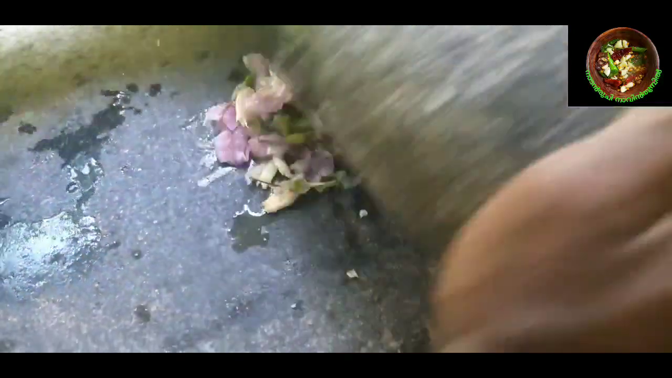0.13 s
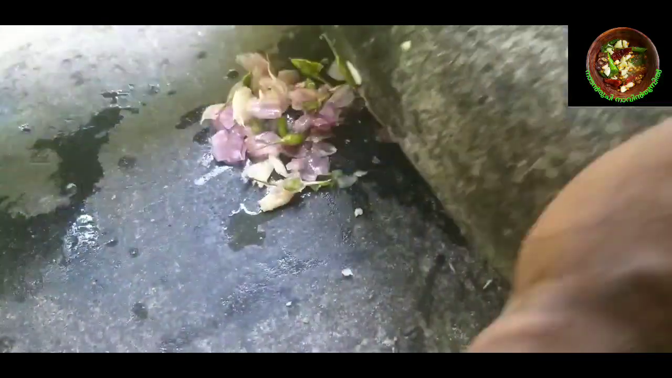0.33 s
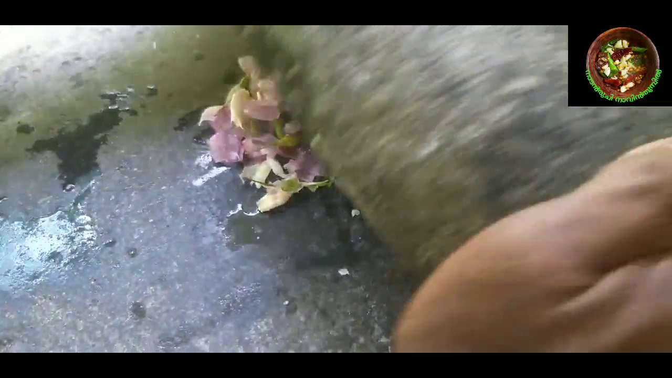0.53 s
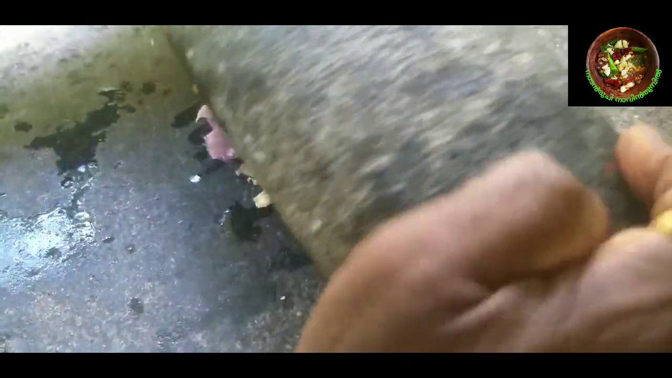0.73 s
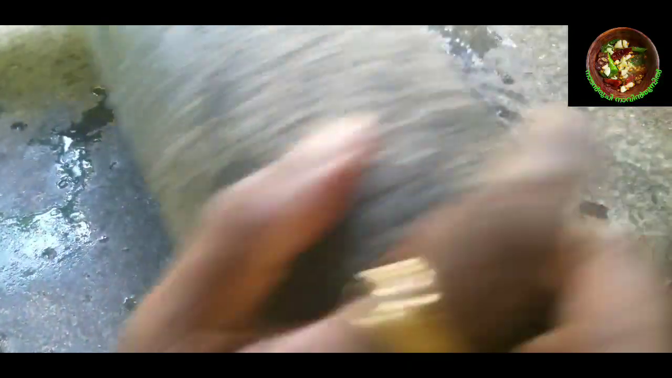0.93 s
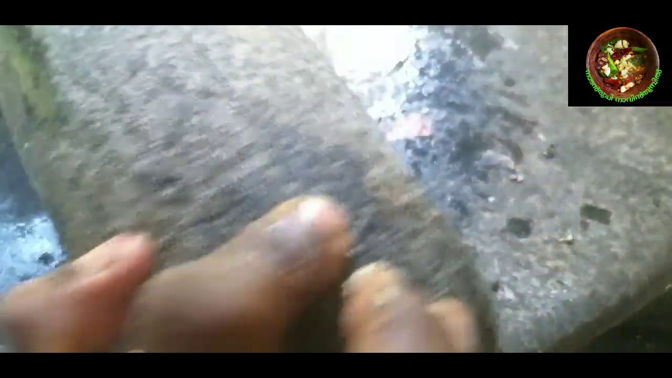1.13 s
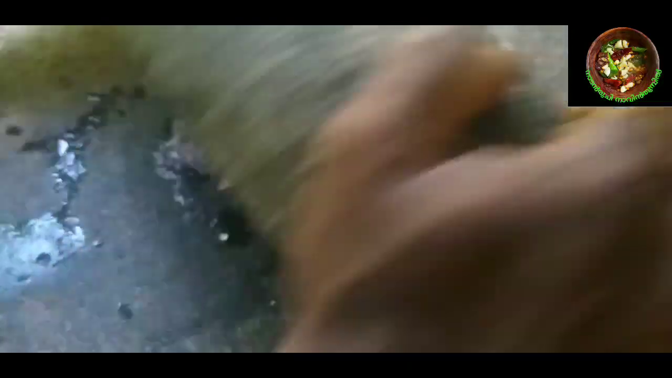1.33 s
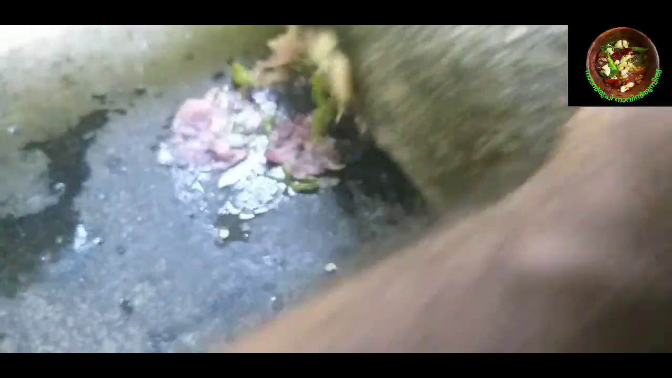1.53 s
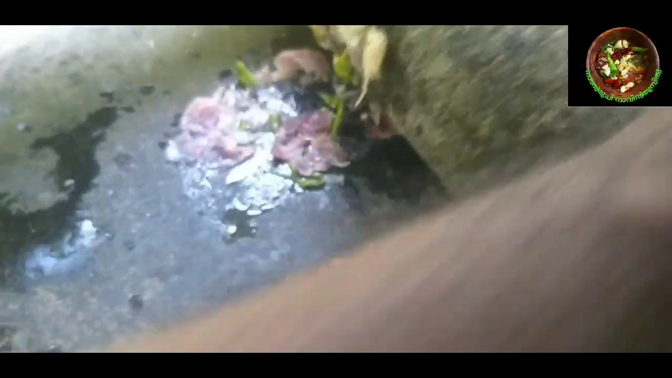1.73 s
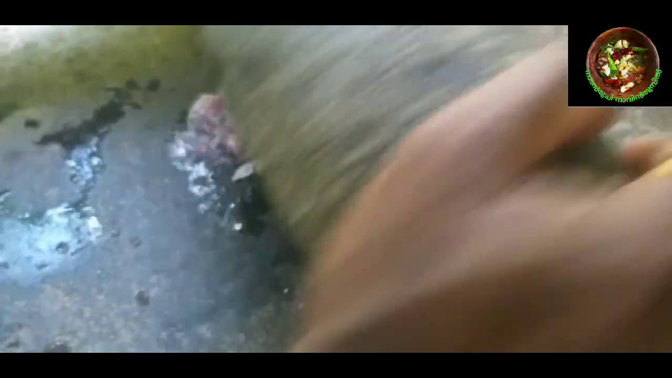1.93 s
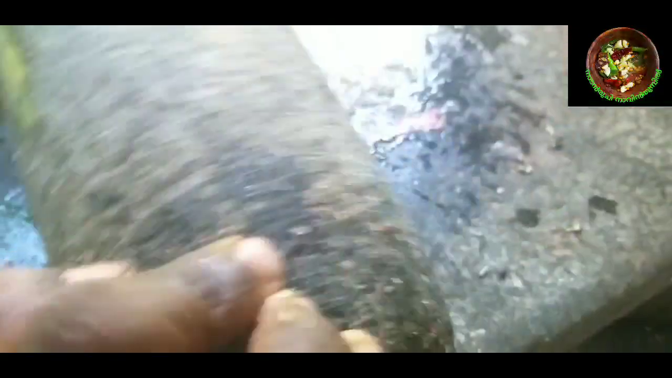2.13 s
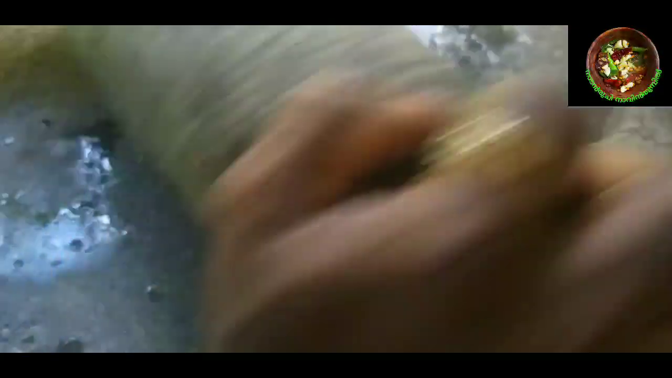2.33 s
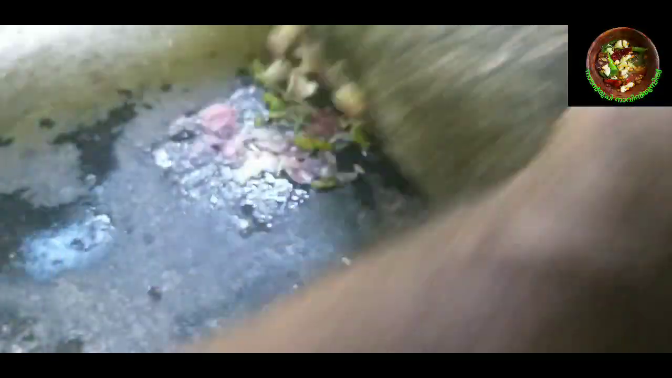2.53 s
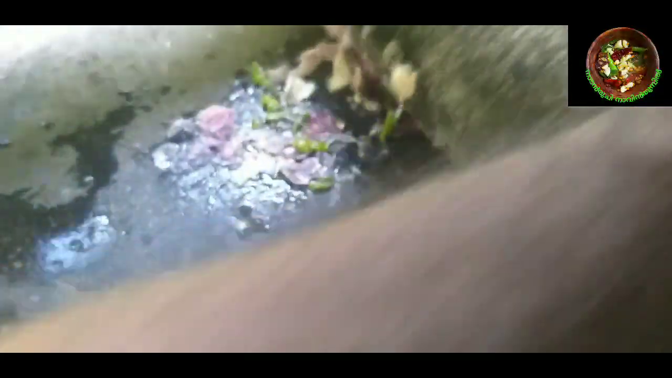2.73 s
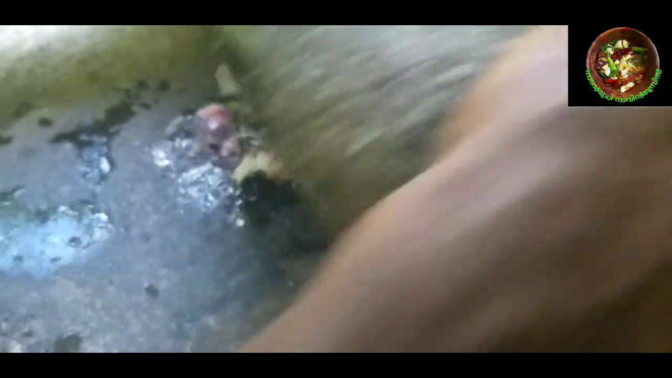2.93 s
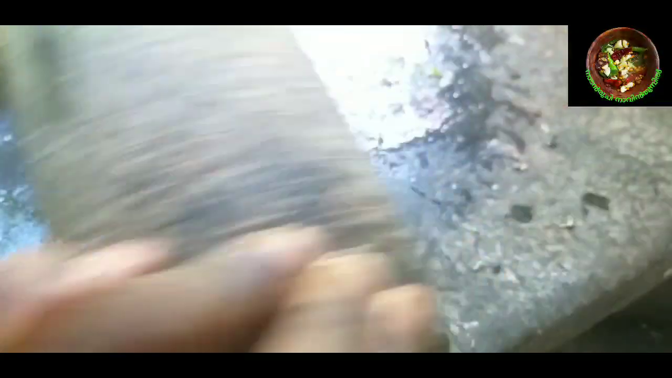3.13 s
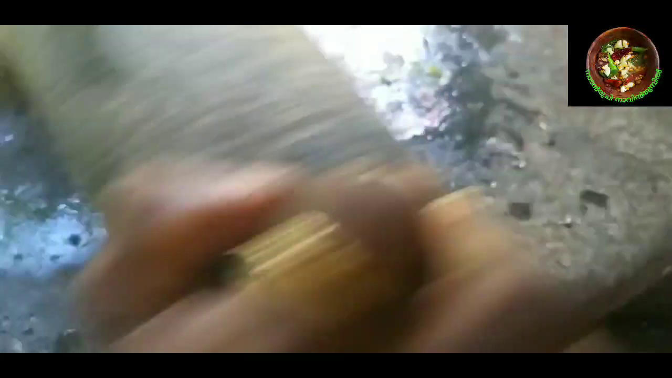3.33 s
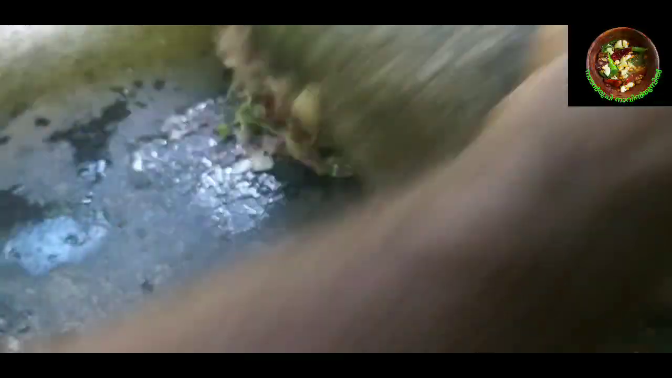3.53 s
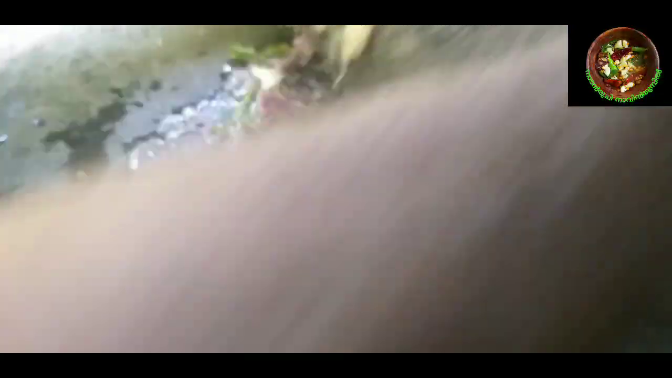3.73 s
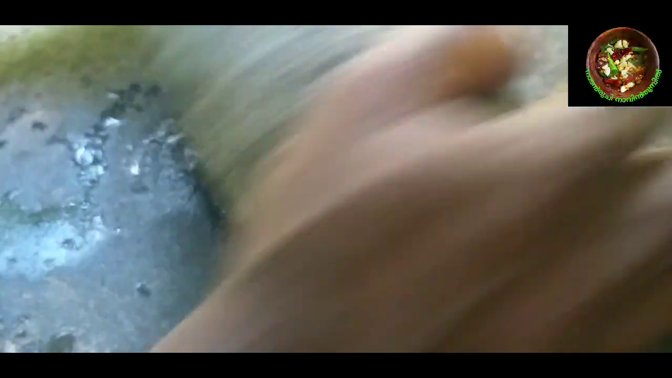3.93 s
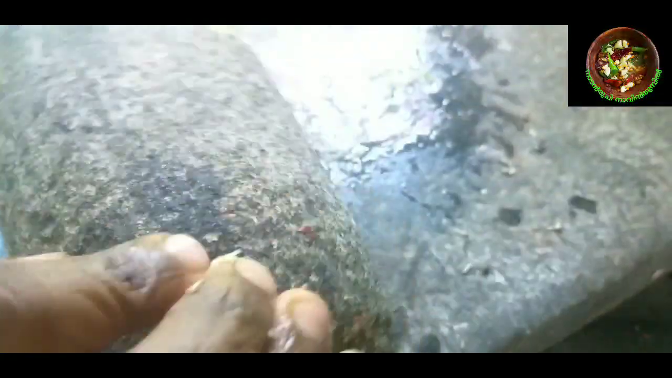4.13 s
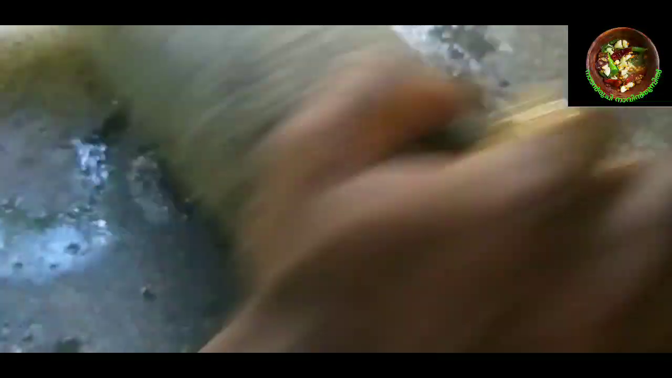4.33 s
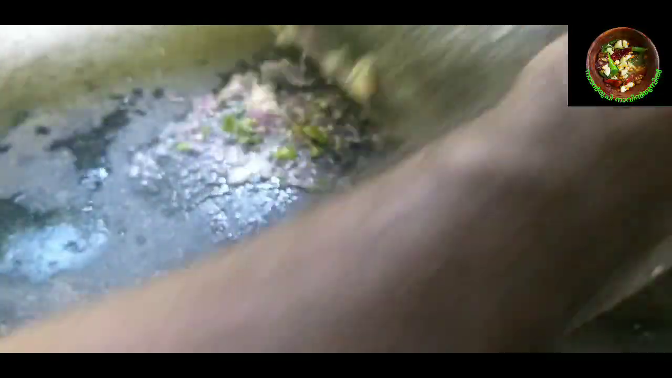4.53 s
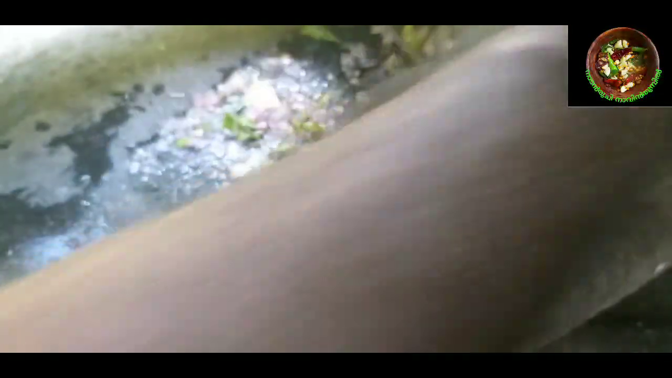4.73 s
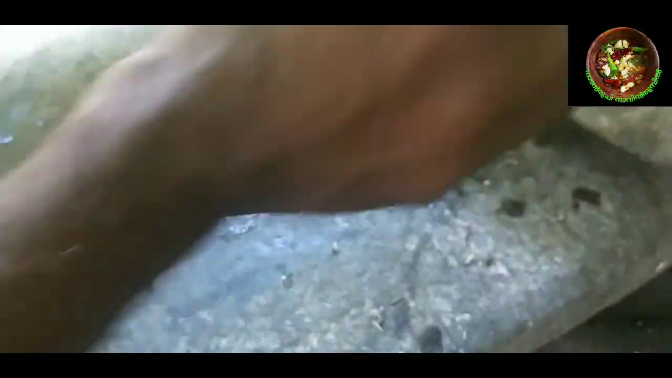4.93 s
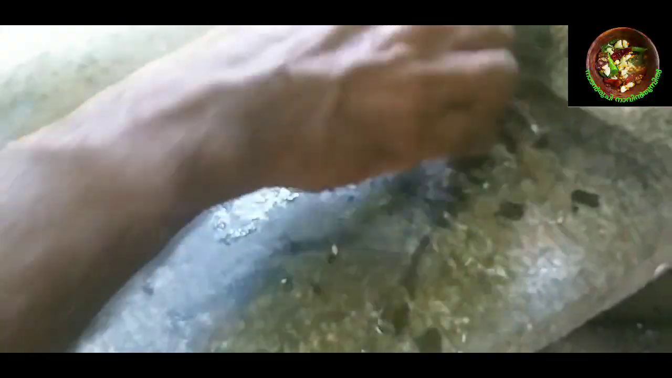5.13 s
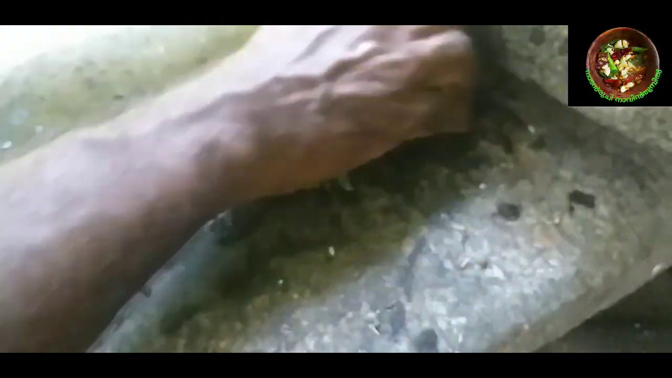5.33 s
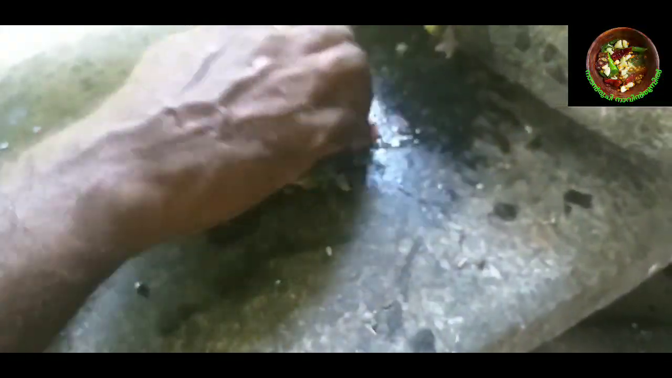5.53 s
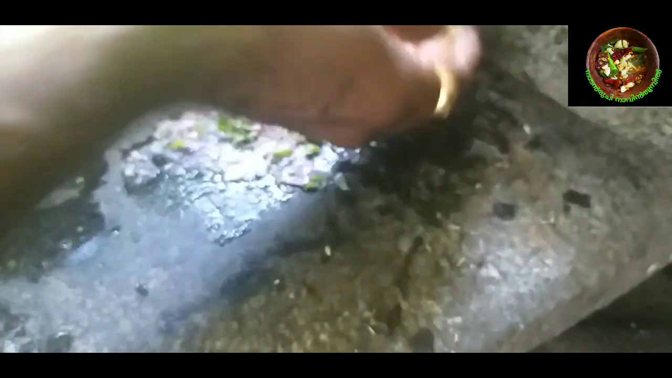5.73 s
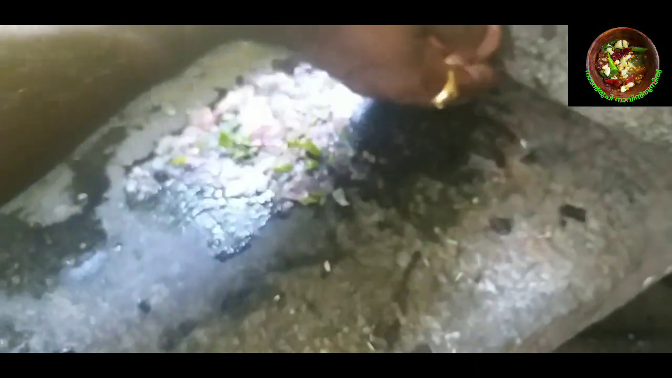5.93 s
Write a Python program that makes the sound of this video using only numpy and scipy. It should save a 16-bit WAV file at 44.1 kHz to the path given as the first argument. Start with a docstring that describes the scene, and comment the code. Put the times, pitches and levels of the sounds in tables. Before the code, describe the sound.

A close microphone hears wet vegetable pulp being ground between stones. It starts lightly with a few sharp snaps, then fuller strokes bring dense juicy crackle, squelches and gritty rasps, with hollow dull thuds where the roller drops. Small squeaks slip through. Finally the crushing stops, the stone bumps gently aside and a hand brushes the wet paste together. Short room reflections, faint hiss and a barely audible high whine surround it.

```python
"""In a kitchen, close to a wet grinding slab: faint hiss and a thin wavering whine (both filtered noise) throughout.
First shallots and chillies crackle, snap and squelch (random clicks through filters) under a stone roller.
As it is pushed to and fro it rumbles and drops with dull knocks (struck slab modes), with thin squeaks and rasping.
At the end it is set aside with a few soft bumps, and a hand sweeps the paste together in a fine rustle."""
import sys
import numpy as np
from scipy import signal
from scipy.fft import rfft, irfft
from scipy.io import wavfile

SR = 44100
rng = np.random.default_rng(int(sys.argv[2]) if len(sys.argv) > 2 else 0)


def generate_wav(signal):
    """Clip the signal to [-1, 1] and save it as 16-bit WAV at the path in sys.argv[1]."""
    frames = np.transpose(np.atleast_2d(signal))
    scaled = np.clip(frames, -1, 1) * 32767
    pcm = np.round(scaled).astype(np.int16)
    wavfile.write(sys.argv[1], SR, pcm)


N = 268569
TIME = np.arange(N) / SR
CUTOFF_HZ = 15800


def from_db(db):
    """Decibels to gain."""
    return 10 ** (np.asarray(db) / 20)


def together(a_db, b_db):
    """Level of two unrelated sounds heard at once: their powers add."""
    return 10 * np.log10(from_db(a_db) ** 2 + from_db(b_db) ** 2)


def rms_one(x):
    """Scale to rms 1."""
    return x / np.sqrt(np.mean(x ** 2) + 1e-20)


def at_hz(points, hz):
    """Read a table of (hz, value) on a log-frequency axis."""
    table_hz, values = np.array(points).T
    return np.interp(np.log(hz), np.log(table_hz), values)


def cut(x, hz, kind, order=2):
    """Butterworth filter."""
    hz = np.clip(hz, 10, .47 * SR)
    return signal.sosfilt(signal.butter(order, hz, kind, fs=SR, output="sos"), x + 1e-18)


def resonate(x, hz, q):
    """Band-pass resonance of sharpness q, never wider than a third of the sample rate."""
    hz = min(hz, SR / 3)
    b, a = signal.iirpeak(hz, max(q, 3 * hz / SR), fs=SR)
    return signal.lfilter(b, a, x)


def drift(rate_hz):
    """Slow random wandering of rms 1, with a new target rate_hz times a second."""
    knots = rng.standard_normal(int(rate_hz * N / SR) + 2)
    return rms_one(np.interp(TIME * rate_hz, np.arange(len(knots)), knots))


def grains(per_s, spread_db, size):
    """Random clicks of uneven strength and either sign, rms 1."""
    born = rng.random(size) < per_s / SR
    strength = from_db(spread_db * np.minimum(rng.exponential(1, size), 4))
    return rms_one(born * strength * rng.choice([-1, 1], size))


def add(out, s, sound):
    """Mix a sound in at time s."""
    at = max(round(s * SR), 0)
    out[at:at + len(sound)] += sound[:N - at]


def bands(low_hz, count):
    """Equal log-width bands up to the cut-off: (low, centre, high)."""
    edges = np.geomspace(low_hz, CUTOFF_HZ, count + 1)
    return zip(edges, np.sqrt(edges[:-1] * edges[1:]), edges[1:])


def effort(moves, levels_db, release_db_per_s, swell_db, lag_s=0, rise_db=20):
    """Level in dB of a run of movements: each rises, bends by swell_db towards its middle, then dies away."""
    power = 1e-12
    for (s, rise, hold, *_), db in zip(moves, levels_db):
        age = TIME - s - lag_s
        attack = rise_db * np.minimum(age / rise, 0)
        swell = swell_db * (np.sin(np.pi * np.clip(age / hold, 0, 1)) - .5)
        release = release_db_per_s * np.maximum(age - hold, 0)
        power = power + from_db(db + attack + swell - release) ** 2
    return 10 * np.log10(power)


# still air of the kitchen, colour only: pitch_hz [Hz], density_db [dB per Hz, relative]
AIR = [(25, -17), (60, -8), (110, 0), (180, 0), (400, -12), (1000, -17), (2500, -22), (6500, -26),
       (8600, -23), (10100, -18), (11000, -20), (12000, -25), (16000, -25)]


def air(level_db=-70):
    """Steady faint hiss: white noise shaped to the colour of the still air."""
    hz = np.maximum(np.fft.rfftfreq(N, 1 / SR), 1)
    spectrum = rfft(rng.standard_normal(N)) * from_db(at_hz(AIR, hz))
    return from_db(level_db) * rms_one(irfft(spectrum, N))


# thin, high whine in the background: time_s [s], pitch_hz [Hz]
WHINE_GLIDE = [(0, 9350), (1.5, 9200), (4.2, 9200), (5.5, 9100), (5.8, 9160), (6.09, 9270)]


def whine(level_db=-82, width_hz=170):
    """A narrow band of hiss on a slowly gliding pitch."""
    pitch_hz = np.interp(TIME, *np.transpose(WHINE_GLIDE))
    phase = 2 * np.pi * np.cumsum(pitch_hz) / SR
    a, b = cut(rng.standard_normal((2, N)), width_hz / 2, "low")
    return from_db(level_db) * rms_one(a * np.cos(phase) + b * np.sin(phase))


# reverberation of the kitchen: pitch_hz [Hz], t60_s [s to fall by 60 dB]
KITCHEN_DECAY = [(100, 0.56), (250, 0.43), (600, 0.34), (1500, 0.32), (5000, 0.14), (15000, 0.2)]


def kitchen(x, gap_s=0.0043):
    """Diffuse reflections, begun after a short gap, that on the whole die sooner in the treble."""
    t = TIME[:SR * 2 // 3]
    tail = 0
    for low, hz, high in bands(92, count=9):
        noise = cut(rng.standard_normal(len(t)), [low, high], "band")
        tail = tail + noise * from_db(-60 * t / at_hz(KITCHEN_DECAY, hz))
    tail = cut(tail * (t > gap_s), 90, "high")
    return signal.fftconvolve(x, tail / np.linalg.norm(tail))[:N]


# the hand sets the roller aside and sweeps the paste together; levels before swell and trims:
# full_s [s, end of the rise], rise_s [s per 20 dB], hold_s [s], pitch_hz [Hz, of the rustle],
# rustle_db, grit_db, rumble_db [dB]
SWEEPS = [(4.62, .05, .08, 4500, -64.5, -65, -58), (4.9, .15, .16, 4200, -66, -76, -58),
          (4.95, .3, .42, 10000, -76, -88, -70), (5.21, .1, .12, 5500, -71.5, -78, -55),
          (5.47, .06, .07, 8000, -70, -77, -61), (5.62, .1, .14, 4000, -88, -88, -62)]


def sweeping(q=1.0, uneven_db=1.0):
    """Fingers drag wet pulp over stone: a fine crackle, each pass with its own colour and uneven pressure."""
    out = 0
    for move in SWEEPS:
        *_, hz, rustle_db, _, _ = move
        level_db = effort([move], [rustle_db], release_db_per_s=189, swell_db=1.0)
        level_db = level_db + uneven_db * drift(42)
        out = out + from_db(level_db) * rms_one(resonate(grains(5800, 3.6, N), hz, q))
    return out


# faint ring of the roller: pitch_hz [Hz], width_hz [Hz], level_db [dB rms under a full stroke, before wavering]
ROLLER = [(3155, 22, -70), (4790, 30, -68)]


def roller_ring(release_db_per_s=60, waver_db=7.0):
    """Grit keeps the roller ringing faintly; the ring comes and goes and outlasts each stroke."""
    level_db = effort(STROKES, np.zeros(len(STROKES)), release_db_per_s, swell_db=0)
    rings = 0
    for hz, width_hz, db in ROLLER:
        ring = rms_one(resonate(grains(900, 1.9, N), hz, hz / width_hz))
        rings = rings + from_db(db + waver_db * np.tanh(drift(9))) * ring
    s, _, _, crackle_db, *_ = np.transpose(STROKES)
    pressure_db = np.interp(TIME, s, crackle_db - crackle_db.max())
    return from_db(level_db + pressure_db / 2) * rings


# squeaks of roller and fingers on wet stone:
# start_s [s], length_s [s], pitch_hz [Hz], width_hz [Hz], level_db [dB rms]
SQUEAKS = [(.425, .11, 6680, 30, -71), (.43, .09, 6020, 35, -75), (.41, .24, 3160, 20, -66),
           (.76, .14, 3160, 25, -73), (1.15, .06, 4900, 60, -66), (2.19, .09, 4780, 40, -68),
           (3.25, .12, 3160, 30, -72), (4.19, .11, 3160, 35, -69), (4.651, .043, 4770, 60, -53.5),
           (4.69, .1, 4790, 40, -77), (4.795, .028, 4930, 130, -68), (4.82, .06, 4930, 120, -79),
           (5.19, .02, 1950, 600, -69), (5.312, .026, 1930, 750, -68), (5.441, .14, 1376, 280, -68)]


def squeaks(wander=0.8):
    """Thin stick-slip whistles: the pitch wanders over their width and the level stutters."""
    out = np.zeros(N)
    for s, length, hz, width_hz, db in SQUEAKS:
        size = int(length * SR)
        pitch = hz + wander * width_hz / 2 * drift(2 * width_hz + 20)[:size]
        stutter = from_db(2 * drift(130)[:size])
        tone = stutter * np.sin(2 * np.pi * np.cumsum(pitch) / SR)
        add(out, s, from_db(db) * rms_one(tone * signal.windows.tukey(size, .7)))
    return out


def grinding(low_hz=850, high_hz=2100, level_db=2, catch_db=5.0):
    """Grains of the two stones catch and slip: a dull rasp under the crackle."""
    moves = STROKES + SWEEPS
    grit_levels = [db for *_, db, _ in moves]
    grit_db = effort(moves, grit_levels, release_db_per_s=147.0, swell_db=1.0, lag_s=0.0056)
    catches = from_db(catch_db * np.tanh(drift(80)))
    rasp = cut(grains(2500, 3.5, N), [low_hz, high_hz], "band") * catches
    return from_db(grit_db + level_db) * rms_one(rasp)


# modes of the slab on its support: pitch_hz [Hz], level_db [dB, relative], t60_s [s to fall by 60 dB]
SLAB = [(102.2, -24.5, 0.57), (135.4, -21, 0.22), (160.2, -17, 0.19), (182.3, -12.5, 0.21),
        (228.3, -12, 0.061), (263.6, -9.5, 0.067), (306.4, -13.5, 0.15), (356, -15.5, 0.16),
        (417.3, -18, 0.17), (463.3, -17, 0.12), (523, -14, 0.064), (561.2, -6.5, 0.086), (618.4, -6, 0.039),
        (632, -6, 0.074), (717.5, -14, 0.18), (780, -9.5, 0.087), (886, -7.5, 0.07), (979, -7.5, 0.057),
        (1080, -5.5, 0.05), (1296, -10, 0.065)]


def slab_ring(struck_hz, vary_db, detune, support_lag_s=0.00614, own_db=-6, low_cut_hz=96,
              lift_db=5, reach_octaves=.16):
    """Decaying modes answer one blow; the struck spot lifts those near its pitch, and chance detunes them."""
    t = TIME[:SR * 2 // 3]
    ring = 0
    for hz, db, t60 in SLAB:
        # the strong modes are the slab's own and start at once; the weak ones arrive through the support
        lag = rng.uniform(0, support_lag_s) * (db < own_db)
        age = np.maximum(t - lag, 0)
        pitch = hz * (1 + detune * rng.standard_normal())
        lift = lift_db * np.exp(-(np.log2(hz / struck_hz) / reach_octaves) ** 2)
        level_db = db + lift + vary_db * rng.standard_normal() - 60 * age / t60
        ring = ring + from_db(level_db) * np.sin(2 * np.pi * pitch * age)
    return cut(ring, low_cut_hz, "high", order=6)


def roll_level():
    """The heavy roller rumbles most where it turns round, runs on after each push, and as it is set aside."""
    *_, stroke_db = np.transpose(STROKES)
    *_, sweep_db = np.transpose(SWEEPS)
    pushed_db = effort(STROKES, stroke_db, release_db_per_s=72.5, swell_db=-7.0, lag_s=0.0067)
    set_aside_db = effort(SWEEPS, sweep_db, release_db_per_s=210.5, swell_db=0.5)
    return together(pushed_db, set_aside_db)


def rolling(soft_hz=170, top_hz=1100, rumble_db=-1, lumpy_db=9.5, hard_db=-18, hardening=0.48):
    """Bumps of rough stone at eight spots keep the slab rumbling; more weight makes them harder."""
    level_db = roll_level()
    lumps = from_db(lumpy_db * np.tanh(drift(30)))
    hum = 0
    for struck_hz in np.geomspace(105, 630, 8):
        bumps = grains(80, 3.6, N) * lumps
        hum = hum + signal.fftconvolve(bumps, slab_ring(struck_hz, vary_db=2.0, detune=0.022))[:N]
    hard = from_db(hard_db + hardening * (level_db - np.median(level_db)))
    rumble = cut(hum, soft_hz, "low") + hard * cut(hum, top_hz, "low")
    return from_db(level_db + rumble_db) * rms_one(rumble)


# roller meets slab: start_s [s], level_db [dB peak], hardness_hz [Hz, of the contact],
# struck_hz [Hz, pitch that the struck spot favours]
KNOCKS = [(0.307, -34.5, 340, 620), (.372, -43, 200, 180), (.439, -46.5, 466, 300),
          (0.517, -39.5, 400, 180), (.562, -35.5, 280, 180), (0.631, -41, 283, 300), (0.666, -40, 380, 620),
          (0.834, -50, 455, 300), (1.103, -17.5, 680, 550), (1.452, -11.5, 600, 625),
          (1.634, -26, 400, 310), (1.672, -35, 330, 380), (1.70, -36, 220, 180), (1.982, -23, 460, 180),
          (2.549, -35.5, 380, 180), (2.613, -35, 280, 180), (3.181, -18, 780, 555), (3.222, -31, 400, 400),
          (3.243, -29, 198, 175), (3.348, -38, 450, 560), (3.559, -38.5, 880, 620), (3.598, -41, 700, 620),
          (4.101, -9.5, 880, 575), (4.555, -44, 260, 190), (4.743, -47, 380, 200), (4.871, -48, 400, 400),
          (4.931, -43, 350, 300), (5.468, -47, 452, 160), (5.53, -46, 200, 130), (1.505, -26, 200, 180),
          (2.04, -28, 190, 180), (2.064, -32, 200, 305), (2.174, -35, 480, 625), (2.196, -41, 520, 625),
          (2.212, -40, 480, 625), (4.26, -33, 120, 130), (4.287, -37, 1000, 980), (4.977, -30, 480, 620),
          (4.993, -27.5, 380, 280), (5.171, -37.5, 440, 440), (5.184, -28, 380, 260),
          (5.238, -35, 220, 175), (5.249, -34, 460, 480), (5.314, -35.5, 140, 170)]


def knocks(pulp_hz=1180):
    """The roller lands on a cushion of pulp: the softer the contact, the duller the knock."""
    out = np.zeros(N)
    for s, db, hardness_hz, struck_hz in KNOCKS:
        ring = slab_ring(struck_hz, vary_db=1.2, detune=.004)
        softened = cut(ring, hardness_hz, "low")
        blow = cut(softened, min(2 * hardness_hz, pulp_hz), "low", order=6)
        add(out, s, from_db(db) * blow / np.abs(blow).max())
    return out


# a piece collapses in a rush of tiny bursts: height_s [s], level_db [dB rms at the height, before trim],
# length_s [s, three times the rise], pitch_hz [Hz], q [sharpness of the pocket]
SQUELCHES = [(0.075, -49.5, 0.027, 4440, 2.8), (0.218, -55, 0.0091, 6100, 2.8),
             (0.316, -40.5, 0.0091, 5600, 1.2), (0.539, -40, 0.0048, 7600, 1.4),
             (1.041, -37, 0.0086, 4830, 1.4), (1.067, -40.5, 0.011, 4300, 1.5),
             (1.433, -29, 0.015, 7900, 2.9), (1.45, -28, 0.01, 4100, 3.9), (1.574, -33, 0.0079, 5840, 2.1),
             (1.844, -40, 0.027, 5700, 2.4), (2.089, -34.5, 0.037, 4500, 2.9),
             (2.181, -38.5, 0.0064, 6800, 2.9), (2.323, -45.5, 0.024, 5500, 1.5),
             (2.4, -35.5, 0.013, 4950, 4.7), (2.453, -36, 0.0047, 3700, 3), (2.495, -31, 0.0076, 5330, 5.9),
             (2.508, -36, 0.015, 5040, 2.5), (2.886, -40.5, 0.008, 4400, 3.6),
             (2.99, -41, 0.036, 4400, 1.6), (3.068, -34.5, 0.019, 4600, 0.91),
             (3.121, -34, 0.0069, 4930, 1.9), (3.368, -32, 0.014, 3950, 1.7),
             (3.448, -36.5, 0.009, 8350, 1.8), (3.533, -36.5, 0.017, 3800, 5.2),
             (4.027, -36.5, 0.013, 4530, 1.4), (4.314, -34.5, 0.011, 6050, 2.5),
             (4.459, -36, 0.0095, 4730, 4.6), (4.479, -34.5, 0.013, 4500, 6.6)]


def squelches(trim_db=-1):
    """A quick swell of bursts through the wet pocket between the stones."""
    out, t = np.zeros(N), TIME[:SR // 8]
    for s, db, length, hz, q in SQUELCHES:
        rise = length / 3
        swell = (t / rise * np.exp(1 - t / rise)) ** 2
        bursts = grains(6000, 2.6, len(t))
        rush = cut(resonate(bursts, hz, q), 2600, "high")
        add(out, s - rise, from_db(db + trim_db) * swell * rms_one(rush))
    return out


# a skin or stalk breaks: start_s [s], level_db [dB peak], pitch_hz [Hz], q [sharpness of the ring],
# tear_db [dB, tearing relative to the break]
SNAPS = [(.169, -32.5, 4740, 1.2, -9), (0.2067, -17, 6150, 1.1, -20.5), (0.268, -32, 4980, 1, -37),
         (0.298, -34.5, 5060, 2.7, -32), (0.5348, -21, 7750, 1.5, -40), (0.8897, -34, 7900, 2, -18),
         (0.99, -32, 9700, 3.3, -22), (1.078, -31, 6000, 0.64, -15), (1.225, -31, 3260, 8.45, -3),
         (1.563, -21.5, 7360, 0.93, -23), (1.5738, -22, 4840, 3.2, -21), (1.595, -25, 6030, 1.1, -18.5),
         (1.888, -24, 5270, 1.2, 2), (1.929, -17.5, 3860, 1.5, -21.5), (2.03, -23.5, 4540, 2.4, -18),
         (2.297, -39, 3860, 4.1, -12), (2.455, -20, 3670, 1.9, -1), (2.498, -20.5, 5480, 3.8, -14),
         (2.556, -31, 6000, 1.5, -29), (2.6148, -28.5, 3160, 1.5, -19.5), (2.63, -29, 3940, 1.6, -20),
         (2.838, -31.5, 4150, 1.2, -23), (3.103, -39, 4960, 1.5, -30), (3.143, -23.5, 8600, 1.45, -21.5),
         (3.3634, -29.5, 3100, 6.2, -9), (3.9473, -29, 3700, 0.84, 5), (3.982, -28, 3380, 1.2, -9),
         (4.038, -33, 4170, 6.6, -5), (4.082, -32, 3700, 2, -11), (4.339, -23.5, 5530, 2.1, -18),
         (4.3997, -21.5, 3430, 3.4, -17), (4.434, -31, 4500, 1.5, -20), (4.467, -18.5, 4500, 2.2, -16),
         (4.487, -23, 5300, 1.1, -29), (4.489, -25, 4200, 1.7, -12), (4.862, -48.5, 4640, 2.8, -18)]


def snaps(tear_s=0.0053):
    """One sharp break, then a few milliseconds of tearing, ring through two resonances."""
    out, t = np.zeros(N), TIME[:SR // 40]
    for s, db, hz, q, tear_db in SNAPS:
        tearing = from_db(tear_db) * grains(7000, 1.6, len(t)) * np.exp(-t / tear_s)
        force = (t == 0) + tearing
        snap = cut(resonate(resonate(force, hz, q), hz, q / 2), 950, "high")
        add(out, s, from_db(db) * snap / np.abs(snap).max())
    return out


# one push or pull of the roller; levels before swell and trims:
# full_s [s, bears down fully], rise_s [s per 20 dB], hold_s [s], crackle_db [dB],
# spray_db [dB, fine spray relative to crackle], grit_db [dB], rumble_db [dB]
STROKES = [(0.11, 0.034, 0.19, -53.5, -6, -68, -56.5), (0.533, 0.072, 0.14, -62, -2, -70, -48.5),
           (1.1, 0.63, 0.014, -51, -14, -73, -70), (1.24, 0.053, 0.35, -46, -8.5, -61, -51),
           (1.846, 0.045, 0.33, -48, -9.5, -59.5, -55.5), (2.323, 0.024, 0.29, -46, -11.5, -60.5, -54),
           (2.891, 0.22, 0.32, -48, -11, -63, -54.5), (3.39, 0.054, 0.19, -44.5, -11, -57.5, -51),
           (3.934, 0.17, 0.18, -46, -11, -59, -59), (4.288, 0.049, 0.25, -45.5, -11, -62, -57.5)]
# the pulp never quite silent while the roller works:
# full_s [s], rise_s [s per 20 dB], hold_s [s], fizz_db [dB, before swell]
FIZZ = [(.06, .03, .47, -75), (.54, .03, 4.22, -70.5)]


def crush_levels(fizz_spray_db=3):
    """Crackle and its share of fine spray follow each stroke's pressure, over the fizz of the resting pulp."""
    _, _, _, crackle_db, spray_db, _, _ = np.transpose(STROKES)
    fizz_db = effort(FIZZ, [db for *_, db in FIZZ], release_db_per_s=258, swell_db=-3.5)
    crushed_db = effort(STROKES, crackle_db, release_db_per_s=198, swell_db=5.5)
    sprayed_db = effort(STROKES, crackle_db + spray_db, release_db_per_s=165.5, swell_db=3.5)
    body_db = together(crushed_db, fizz_db)
    fine_db = together(sprayed_db, fizz_db + fizz_spray_db)
    return body_db, fine_db - body_db


# colour of the bursting cells: pitch_hz [Hz], density_db [dB per Hz, relative]
PULP = [(470, -44), (800, 3), (918, -5), (1030, 8.5), (1270, -3), (2150, -10.5), (2320, -10), (2530, -8),
        (2800, -3.5), (3470, -2.5), (5310, -3.5), (10800, -13), (14800, -23), (16000, -33)]


def crackle(per_s=1500, spread_db=4.0, clump_db=2.0, own_db=2.0, spray_trim_db=7, broad_share=.55):
    """Cells burst by the thousand, in clumps; fine spray brightens the crackle."""
    crush_db, spray_db = crush_levels()
    clumps_db = clump_db * drift(170)
    broad = grains(per_s / 2, spread_db, N)      # bursts so short that they fill every band
    out, body_power = np.zeros(N), 0
    for low, hz, high in bands(1892, count=12):
        bursts = broad_share * broad + grains(per_s, spread_db, N)
        band = from_db(at_hz(PULP, hz)) * cut(bursts, [low, high], "band")
        band = band * from_db(clumps_db + own_db * drift(90))
        body_power += np.var(band) * (hz < 7000)   # the level is set by the bands below 7 kHz
        spray_share = at_hz([(5500, 0), (10000, 0.79)], hz)
        out += band * from_db(spray_share * (spray_db + spray_trim_db))
    return from_db(crush_db) * out / np.sqrt(body_power)


def scene(stone_room_db=-10, pulp_room_db=-12):
    """Stone and pulp close by, the kitchen around them."""
    stone = knocks() + rolling() + grinding()
    pulp = crackle() + snaps() + squelches() + squeaks() + sweeping() + roller_ring()
    room = kitchen(from_db(stone_room_db) * stone + from_db(pulp_room_db) * pulp)
    return (stone + pulp + room + air() + whine())[None]


def record(dry):
    """One microphone channel: the top is cut steeply."""
    return signal.sosfilt(signal.ellip(10, .1, 70, CUTOFF_HZ, fs=SR, output="sos"), dry)


dry = scene()
out = record(dry)
generate_wav(out)
```